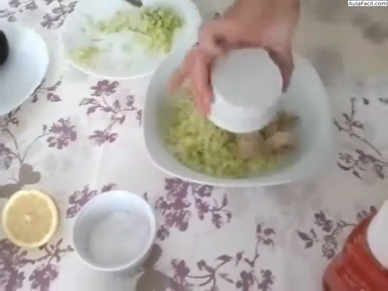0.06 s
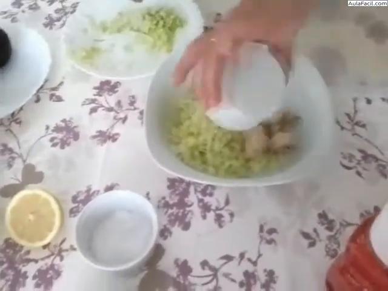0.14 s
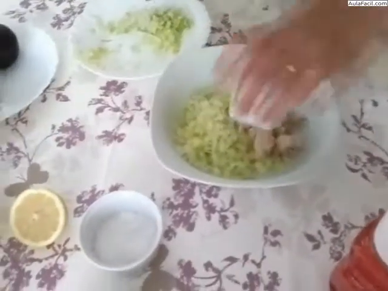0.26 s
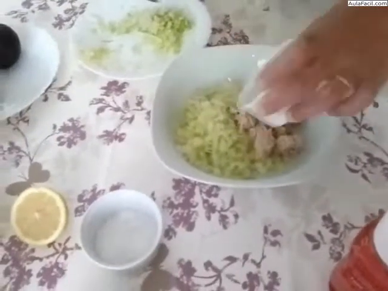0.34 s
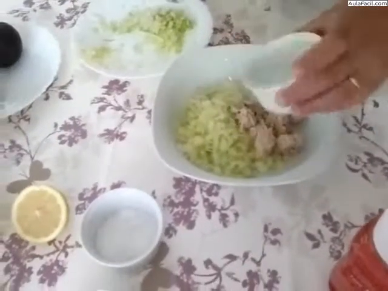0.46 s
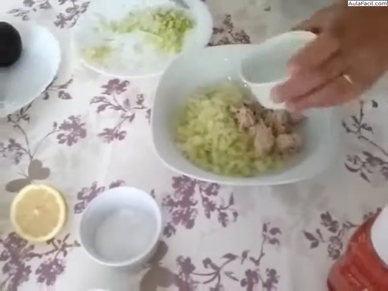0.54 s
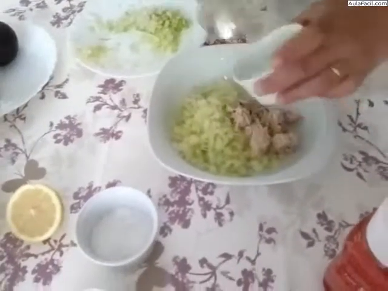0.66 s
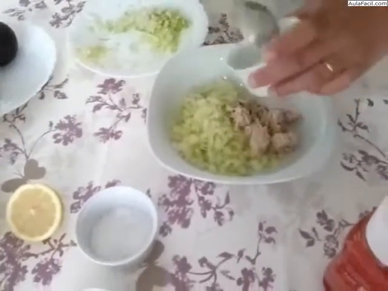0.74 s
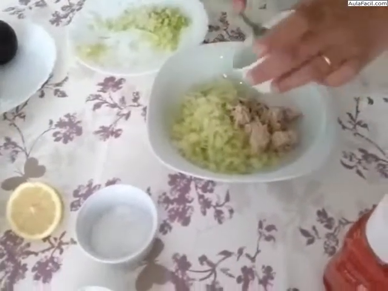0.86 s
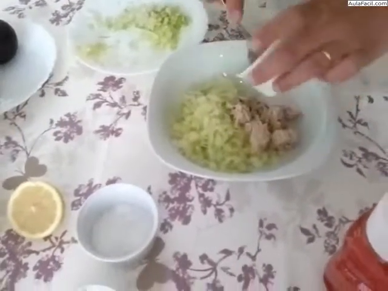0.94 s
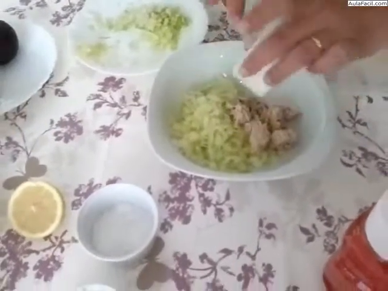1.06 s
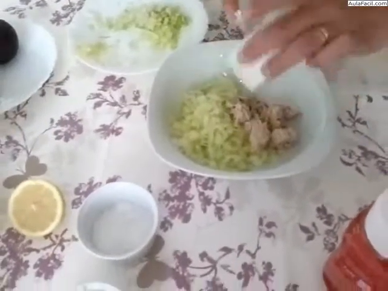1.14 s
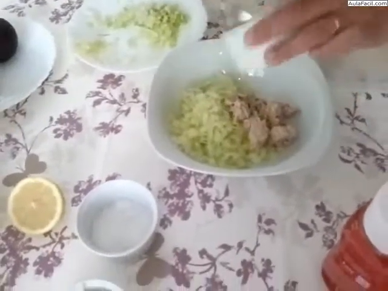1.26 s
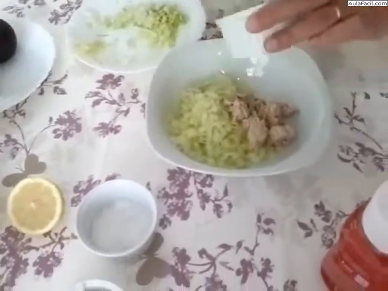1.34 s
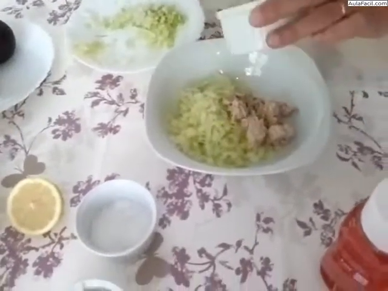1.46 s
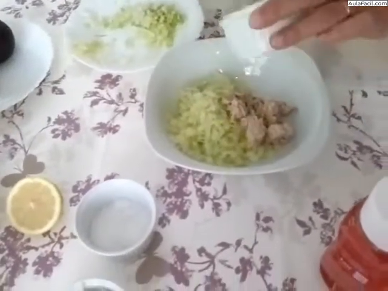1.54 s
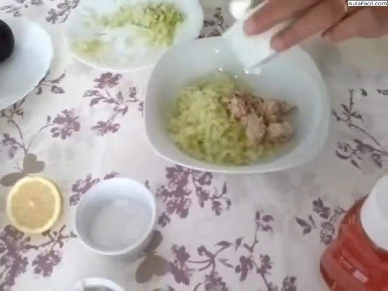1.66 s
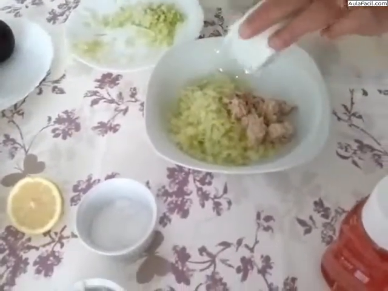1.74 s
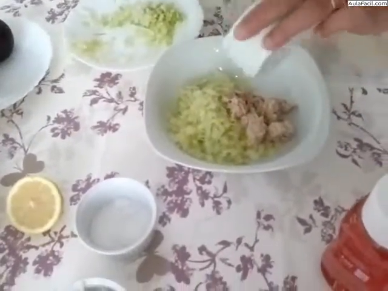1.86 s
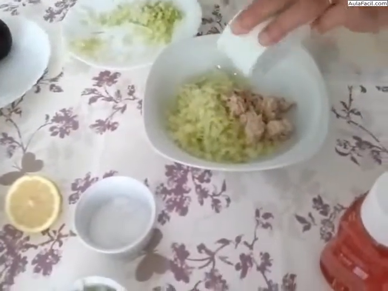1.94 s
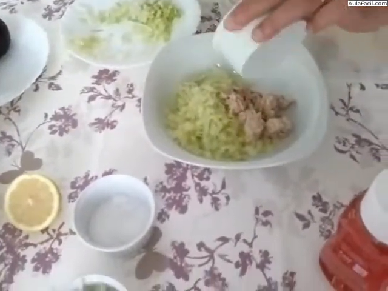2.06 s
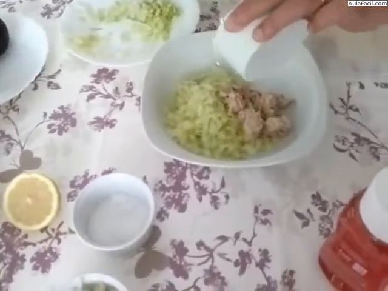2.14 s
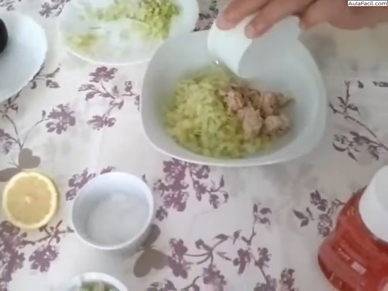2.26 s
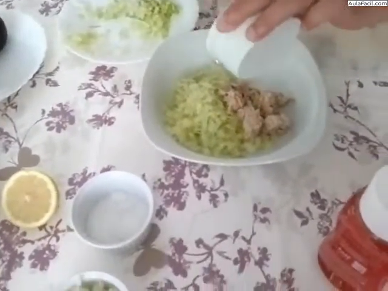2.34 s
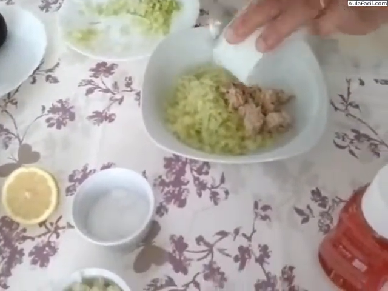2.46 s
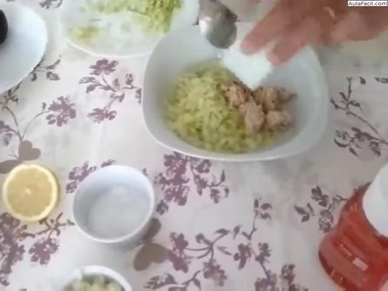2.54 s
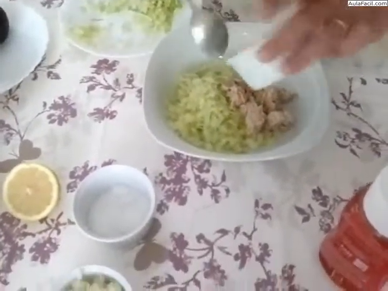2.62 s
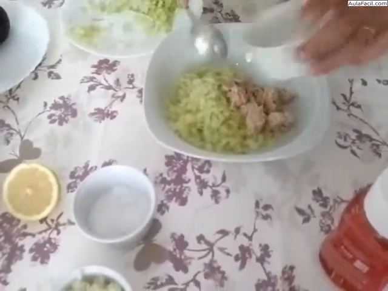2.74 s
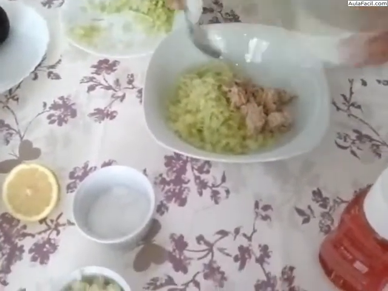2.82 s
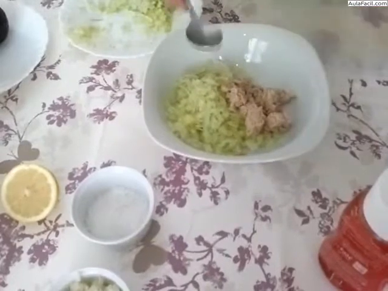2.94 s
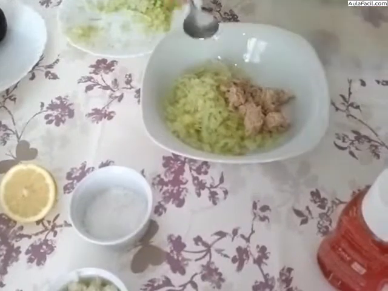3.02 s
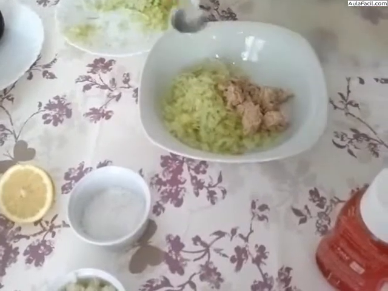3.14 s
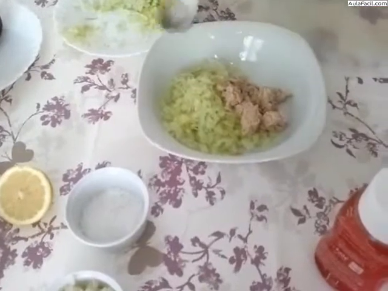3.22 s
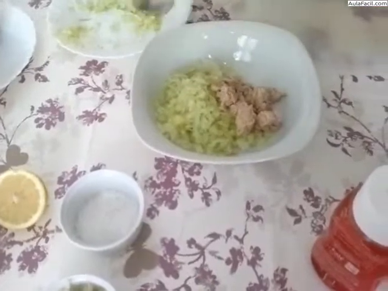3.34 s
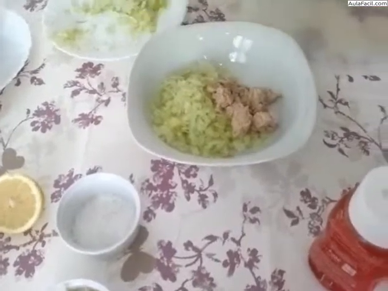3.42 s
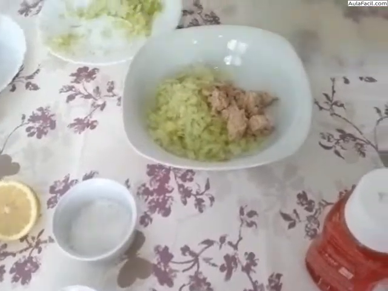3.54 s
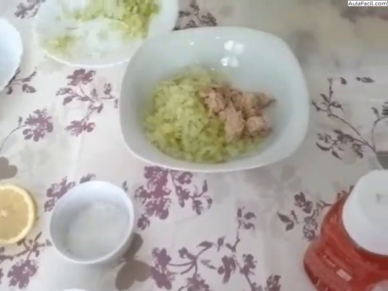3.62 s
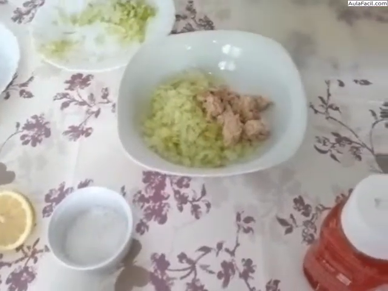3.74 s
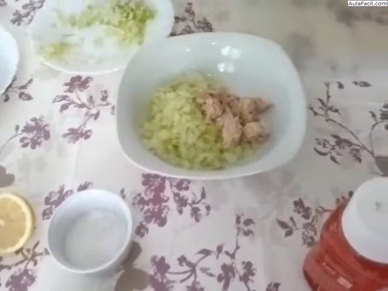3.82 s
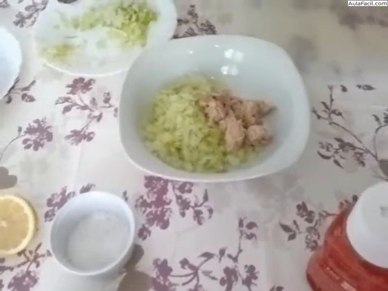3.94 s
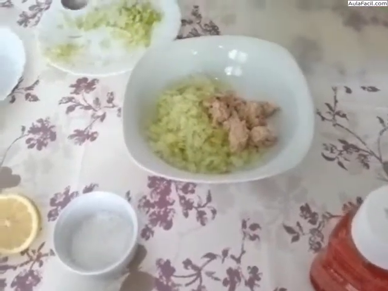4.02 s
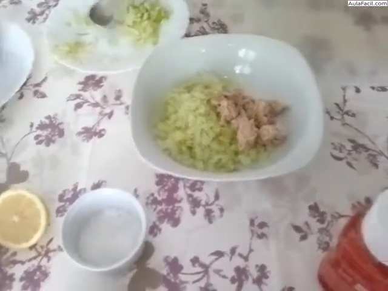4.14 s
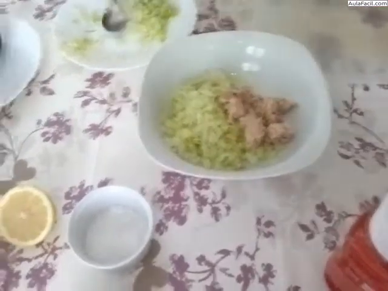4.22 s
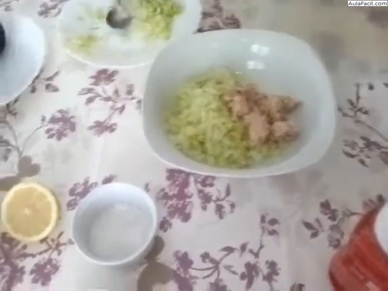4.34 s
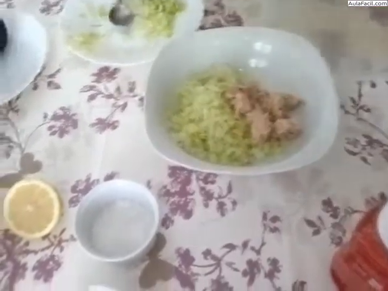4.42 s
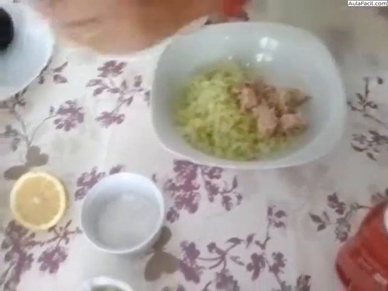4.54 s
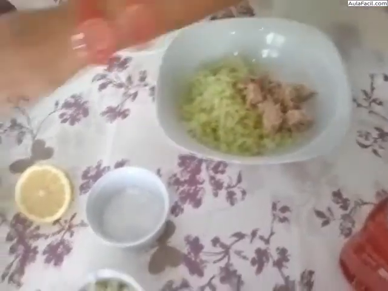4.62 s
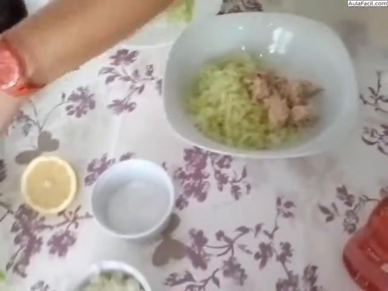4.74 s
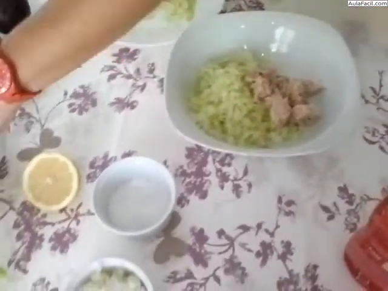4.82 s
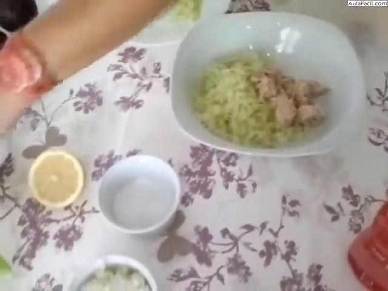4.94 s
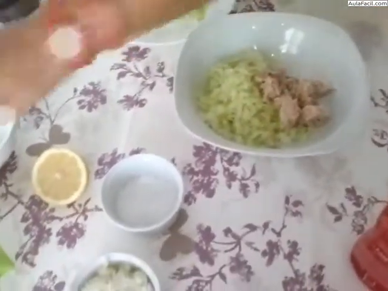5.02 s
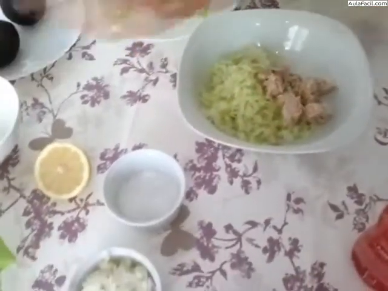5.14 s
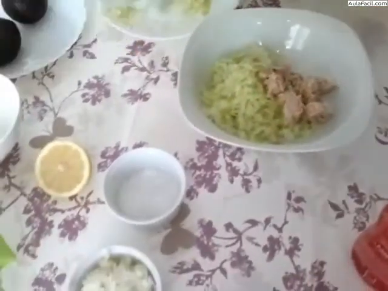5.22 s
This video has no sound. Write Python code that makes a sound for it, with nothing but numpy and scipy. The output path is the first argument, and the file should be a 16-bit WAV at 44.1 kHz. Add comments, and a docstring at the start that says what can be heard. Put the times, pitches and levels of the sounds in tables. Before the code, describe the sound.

Bright spoon-on-cup clinks, small scrapes and soft table bumps in a small hard kitchen, ending with a spoon set down on a plate.

```python
"""A low throbbing drone and an appliance hum run throughout, with soft bumps on a cloth-covered table and food dropping;
a steel spoon clinks and scrapes in a small ceramic cup as tuna is emptied into a bowl, and is laid on a plate.
Hard contacts sum decaying modes and filtered noise bursts; scrapes are sprays of slips; thuds are shaped low noise.
Hum and drone are sines, hush and boom filtered noise; a small bright kitchen adds reflections to hard contacts,
scrapes and food drops. All is heard in mono."""
import sys
import numpy as np
from scipy import signal
from scipy.fft import rfft, irfft, next_fast_len
from scipy.io import wavfile
from scipy.ndimage import map_coordinates

SR = 44100
rng = np.random.default_rng(int(sys.argv[2]) if len(sys.argv) > 2 else 0)


def wav_out(sig):
    """Save sig, one row per channel (or a flat mono array), as 16-bit PCM at SR to the path in sys.argv[1]."""
    wavfile.write(sys.argv[1], SR, np.round(np.clip(np.atleast_2d(sig).T, -1, 1) * 32767).astype(np.int16))


N = 232402
T = np.arange(SR // 2) / SR  # time axis of one contact or room response [s]
IMPULSE = 1. * (T == 0)

# Reverberation of the kitchen. Each row: frequency in Hz, t60 in s (before a late fade of the tail).
REVERBERATION = [(150, 0.71), (1000, 0.38), (2500, 0.27), (5000, 0.26), (9000, 0.25), (15000, 0.13)]
# Spectrum of the room's hush. Each row: frequency in Hz, relative level in dB.
HUSH_SPECTRUM = [(12, -39.5), (20, -10), (60, -2.5), (95, -14.5), (112, -7), (135, 0.5), (187, -13),
                 (329, -10), (357, -10), (629, -15), (823, -23), (892, -26.5), (1530, -29), (1950, -30),
                 (12300, -47), (13200, -72), (22000, -120)]
# Lines of the appliance hum. Each row: mean frequency in Hz, mean level in dB.
HUM_LINES = [(132, -68.5), (331, -73), (397, -77.5), (593, -77)]
# Course of the two low sounds. Each row: time in s, throbbing drone level in dB, boom level in dB.
LOW_LEVELS = [(0, -58, -61), (.25, -45, -48), (.43, -82, -79), (0.848, -73, -73.5), (1.1, -63.5, -58),
              (1.5, -77, -55.5), (1.631, -89, -69), (1.92, -76, -74.5), (2.002, -61, -52.5),
              (2.45, -52, -54), (2.85, -65.5, -70.5), (3.2, -62.5, -60), (3.701, -70, -71),
              (3.999, -63, -57.5), (4.8, -59, -57), (5.27, -62.5, -62)]
# Dull bumps of hands, tin and dishes on the table. Each row: peak in s, level in dB, hill centre in Hz.
TABLE_BUMPS = [(0.158, -54.5, 94), (0.233, -47.5, 71.5), (1.149, -59, 129), (1.311, -59, 140),
               (1.492, -50.5, 131), (2.738, -54.5, 110), (2.975, -61, 402), (4.192, -48.5, 422),
               (4.354, -42.5, 175), (4.679, -51, 240), (4.921, -41, 84)]
# Things sliding over the tablecloth. Each row: peak in s, swell in s, level in dB, hill centre in Hz.
TABLE_SHUFFLES = [(.1, 0.1, -61.5, 328), (.33, 0.042, -56, 161), (0.851, 0.033, -59.5, 469.5),
                  (1.792, 0.063, -60, 524), (2.35, 0.23, -61.5, 246), (3.15, 0.079, -62.5, 376),
                  (4.96, 0.048, -51.5, 215), (5.199, .08, -54.5, 75.7)]
# Wet lumps smacking down. Each row: start in s, level in dB, low-pass cutoff in Hz.
FOOD_SMACKS = [(0.273, -48.5, 2040), (0.2756, -42.5, 1830), (2.744, -55, 2920), (2.7469, -50.5, 2700)]
# Slow rubs of tin, cup and fingers. Each row: peak in s, swell in s, level in dB, hill centre in Hz.
SLOW_RUBS = [(.085, 0.069, -60, 2060), (.27, 0.026, -61, 1620), (0.891, 0.043, -61, 1900),
             (1.674, 0.027, -50, 2480), (2.12, .06, -71, 2370), (2.251, 0.011, -49, 2006),
             (3.2, 0.036, -71, 2370), (3.942, 0.015, -73.5, 2044), (4.239, .02, -63.5, 2225),
             (4.88, 0.12, -71.5, 2050)]
# Quick scuffs of the spoon. Each row: peak in s, level in dB, hill centre in Hz, hill spread in octaves.
QUICK_SCUFFS = [(2.206, -50, 2390, 0.58), (3.641, -60.5, 2550, 0.7), (3.749, -64.5, 1170, 0.62),
                (3.832, -64.5, 1860, 0.6), (4.202, -51.5, 1850, 0.68), (4.203, -59, 7300, 0.48),
                (4.362, -71.5, 1830, 0.33)]
# Light, damped touches of the crockery. Each row: start in s, level in dB, mode in Hz before a pitch factor.
LIGHT_TOUCHES = [(1.668, -47, 3000), (2.196, -41.5, 2740), (2.613, -34.5, 2300), (3.405, -67, 1570)]
# Spoon laid on the plate. Each row: start in s, level in dB before the shares of clack and ring.
PLATE_CONTACTS = [(4.65, -37), (4.663, -23), (4.671, -47)]
# Ringing modes of spoon, cup and plate. Each row: frequency in Hz before a pitch factor and a small
# random shift, mean relative level in dB, t60 in s.
SPOON_MODES = [(2270, -9.5, .1), (2390, 6.5, 0.095), (2460, -11.5, .08), (5445, -2, 0.017),
               (5530, -1, 0.051), (9300, -3, 0.05), (10100, -9, 0.032)]
CUP_MODES = [(1450, -8, .06), (2110, -15.5, 0.14), (3384, -9.5, .06), (6760, -9.5, 0.23), (6930, 5, 0.1),
             (8370, -22, 0.075), (11400, -12, 0.032), (11960, -10, 0.037), (13950, -24, .05)]
PLATE_MODES = [(1522, -22.5, 0.072), (2040, -9, 0.089), (2544, 2, 0.042), (3140, -12, 0.12),
               (4230, -5.5, 0.13), (4717, 4, 0.039), (5670, -3, 0.048), (6830, -5.5, 0.13),
               (8220, -9, 0.051), (9400, -9.5, 0.087), (9720, -8, .07), (10770, -7, 0.056)]
# Crowded modes of the plate. Each row: frequency in Hz, relative gain in dB.
PLATE_CROWD = [(120, -62), (200, -36), (393, -6), (744, -20.5), (943, -15), (1150, -22.5), (1460, -6),
               (3500, -1.5), (4210, 3.5), (5330, -15), (6880, -14), (10700, -19), (15600, -14.5)]
# Broad, heavily damped resonances of the hand-held cup and spoon. Each row: centre in Hz,
# width in Hz, relative gain in dB.
CUP_CROWD = [(680, 1300, -10.5), (1450, 520, 0), (2600, 820, 0.5), (3260, 130, 8.5), (4400, 2600, -7),
             (5700, 330, -6.5), (6160, 430, -8), (6900, 920, -3.5), (8340, 380, -5.5), (9813, 650, -5),
             (10630, 350, -11.5), (11920, 1200, -5), (12900, 500, -16), (13950, 560, -8.5)]
# The spoon grazes the rim and chatters once. Each row: first touch in s, rebound in s after it, then for
# the rebound: spoon ring in dB, clack in dB, cup ring in dB.
RIM_GRAZES = [(0.988, 0.0091, -32.5, -40.5, -52.5), (1.451, 0.009, -36.5, -41.5, -56.5),
              (1.815, 0.0092, -26.5, -36, -48.5), (2.422, 0.0097, -58, -36, -32.5)]
# The spoon hits the cup squarely. Each row: start in s, clack in dB, spoon ring in dB, cup ring in dB,
# main cup partial in Hz, knock in dB, knock centre in Hz.
CUP_STRIKES = [(1.0174, -24, -36.5, -32.5, 6930, -26.5, 1981), (1.022, -27, -43.5, -21, 6937, -32, 4574),
               (1.482, -28.5, -35, -35, 6970, -30, 3530), (1.498, -31, -54, -37.5, 6970, -29.5, 2144),
               (1.907, -23.5, -31.5, -26.5, 7088, -46.5, 1450), (2.465, -29.5, -31, -31, 6863, -25.5, 3310),
               (2.609, -36.5, -38, -40, 6830, -34, 3560)]

TOP_HZ = 15750  # upper band limit
DRONE_HZ, THROB_HZ, THROB_DB = 56.6, 6.7, -3.5  # a second tone this much lower beats with the first
BOOM_HZ, BOOM_OCTAVES = 136.4, 0.15
MOVE_S = 1.2  # length of the window that holds one movement
BUMP_RISE_S, BUMP_FALL_S, BUMP_OCTAVES = 0.0066, 0.034, 1.0
SHUFFLE_OCTAVES = 0.87
SLIPS_PER_S = 1600
RUB_OCTAVES, RUB_TOP = .42, 1.45  # spread of a rub; its treble is cut at this multiple of the centre
SCUFF_RISE_S, SCUFF_FALL_S = 0.012, .016
TOUCH_T60_S = 0.049
CUP_HZ = 6930  # main cup partial at pitch 1
GRAZE_TILT_DB, STRIKE_TILT_DB = 4.5, 1  # clack brightness per octave
# levels of a graze's first touch against its rebound
FIRST_TOUCH_RING_DB, FIRST_TOUCH_CLACK_DB, FIRST_TOUCH_CUP_DB = -3, -3.5, -15
FIRST_TOUCH_TOP_HZ = 6860  # being light, it is also duller


def amp(db):
    """The decibel law: level to amplitude gain."""
    return 10 ** (np.asarray(db) / 20)


def unit(x):
    """Normalisation of power: scaled to rms 1."""
    return x / np.sqrt(np.mean(x ** 2) + 1e-20)


def blow(x):
    """Normalisation of energy: scaled to that of 30 ms at rms 1."""
    return x / np.sqrt(np.sum(x ** 2) / (.03 * SR) + 1e-20)


def along(points, hz):
    """Interpolation of (Hz, value) points on a logarithmic frequency axis."""
    f, v = np.transpose(points)
    return np.interp(np.log(hz + 1), np.log(f + 1), v)


def wobble(rate):
    """Slow random fluctuation: a smooth curve through rate random knots a second."""
    knots = rng.standard_normal(int(N * rate / SR) + 4)
    return map_coordinates(knots, [np.arange(N) * rate / SR])


def filtered(x, response):
    """Linear filtering: the spectrum of x times a response of frequency."""
    m = next_fast_len(len(x) + 4096)
    return irfft(rfft(x, m) * response(np.fft.rfftfreq(m, 1 / SR)), m)[:len(x)]


def hill(hz, centre_hz, octaves):
    """A broad resonance: a Gaussian on a log axis, octaves its standard deviation."""
    return np.exp(-.5 * (np.log2((hz + 1) / centre_hz) / octaves) ** 2)


def shaped(grain, envelope, response):
    """Modulated noise: grain under an envelope, coloured, with the envelope's own energy."""
    return unit(filtered(grain * envelope, response)) * np.sqrt(np.mean(envelope ** 2))


def stroke(rise, fall):
    """Envelope of a movement: a swell that peaks in the middle of its window."""
    t = np.arange(int(MOVE_S * SR)) / SR - MOVE_S / 2
    scale = np.where(t < 0, rise, fall)
    return np.exp(1 - np.sqrt(1 + 2 * (t / scale) ** 2))


def add(track, s, x):
    """Superposition: mix x into the track from time s."""
    start = round(s * SR)
    part = x[max(-start, 0):N - start]
    track[max(start, 0):][:len(part)] += part


def through(x, path):
    """Convolution: x as it arrives along a path."""
    return signal.fftconvolve(x, path)[:len(x)]


def kitchen(direct_db):
    """Room impulse response: direct sound, a few bounces off table and bowl, a dense tail from hard walls."""
    hz, t, noise = signal.stft(rng.standard_normal(len(T)), SR, nperseg=256)
    decay = amp(-60 * t / along(REVERBERATION, hz)[:, None])
    tail = signal.istft(noise * decay, SR, nperseg=256)[1][:len(T)]
    # the tail builds up gradually and fades faster late on
    tail = tail * (1 - np.exp(-T / 0.0043)) * np.exp(-(T / .17) ** 4)
    # the hand shades the treble of the direct sound
    direct = signal.lfilter(*signal.butter(1, 5000, fs=SR), IMPULSE)
    path = tail / np.linalg.norm(tail) + amp(direct_db) * direct
    # close surfaces repeat it all within a few milliseconds and comb its spectrum
    near = IMPULSE.copy()
    near[rng.integers(SR // 2000, SR // 160, size=4)] += .3 * rng.choice([-1, 1], size=4)
    return through(path, near / np.linalg.norm(near))


def hum():
    """Frequency modulation: the appliance's lines waver together in pitch, each also in level."""
    turns = np.cumsum(1 + .006 * wobble(19)) / SR
    return sum(amp(db + 5.6 * wobble(25)) * np.sin(2 * np.pi * hz * turns) for hz, db in HUM_LINES)


def hush():
    """Coloured noise of the room: its low part comes in lumps, the hiss stays smooth."""
    noise = unit(filtered(rng.standard_normal(N), lambda f: amp(along(HUSH_SPECTRUM, f))))
    rumble = filtered(noise, lambda f: 1 / (1 + (f / 900) ** 4))
    lumpy = rumble * amp(2.8 * wobble(30) - 3.5)
    return amp(-62.0) * (noise - rumble + lumpy)


def drone():
    """Beating: two close low tones throb under a narrow noise-band boom that comes and goes."""
    t = np.arange(N) / SR
    s, *levels = np.transpose(LOW_LEVELS)
    drone_db, boom_db = [np.interp(t, s, level) for level in levels]
    # the phase of each tone wanders
    upper, lower = [np.sin(2 * np.pi * hz * t + 1.3 * wobble(5)) for hz in (DRONE_HZ, DRONE_HZ - THROB_HZ)]
    tones = unit(upper + amp(THROB_DB) * lower)
    boom = unit(filtered(rng.standard_normal(N), lambda f: hill(f, BOOM_HZ, BOOM_OCTAVES)))
    return amp(drone_db) * tones + amp(boom_db) * boom


def thud(envelope, hz, octaves):
    """Absorption: the tablecloth leaves only the low part of a movement."""
    noise = rng.standard_normal(len(envelope))
    return shaped(noise, envelope, lambda f: hill(f, hz, octaves) / np.sqrt(f + 30))


def table():
    """Impact and sliding: bumps start abruptly and die away; shuffles swell and fade evenly."""
    out = np.zeros(N)
    for s, db, hz in TABLE_BUMPS:
        add(out, s - MOVE_S / 2, amp(db) * thud(stroke(BUMP_RISE_S, BUMP_FALL_S), hz, BUMP_OCTAVES))
    for s, swell, db, hz in TABLE_SHUFFLES:
        add(out, s - MOVE_S / 2, amp(db) * thud(stroke(swell, swell), hz, SHUFFLE_OCTAVES))
    return out


def smacks():
    """Soft impact: a wet lump lands with one short dull snap, a band-limited impulse with no ring."""
    out = np.zeros(N)
    for s, db, top_hz in FOOD_SMACKS:
        snap = signal.sosfilt(signal.butter(8, top_hz, fs=SR, output="sos"), IMPULSE)
        snap = signal.sosfilt(signal.butter(1, 220, "high", fs=SR, output="sos"), snap)
        reflected = through(snap, kitchen(direct_db=18))
        add(out, s, amp(db) * blow(snap + amp(-16.0) * reflected))
    return out


def friction(envelope, colour):
    """Stick-slip friction: a spray of tiny slips of uneven size, muffled by the wet food."""
    slipping = rng.random(len(envelope)) < SLIPS_PER_S / SR
    slips = rng.standard_normal(len(envelope)) * slipping
    return shaped(slips, envelope, colour)


def scrapes():
    """Sliding contact: rubs swell and fade evenly, muffled; scuffs are short, each with its own colour."""
    out = np.zeros(N)
    for s, swell, db, hz in SLOW_RUBS:
        colour = lambda f: hill(f, hz, RUB_OCTAVES) / np.sqrt(1 + (f / (RUB_TOP * hz)) ** 20)
        add(out, s - MOVE_S / 2, amp(db) * friction(stroke(swell, swell), colour))
    for s, db, hz, octaves in QUICK_SCUFFS:
        colour = lambda f: hill(f, hz, octaves)
        add(out, s - MOVE_S / 2, amp(db) * friction(stroke(SCUFF_RISE_S, SCUFF_FALL_S), colour))
    path = kitchen(direct_db=10.5)
    return through(out, path / np.linalg.norm(path))


def ring(modes, path, pitch, attack):
    """Modal synthesis: decaying modes, at slightly new strengths for every point of contact."""
    out = np.zeros(len(T))
    for (hz, db, t60), chance in zip(modes, rng.standard_normal((len(modes), 2))):
        tone = np.sin(2 * np.pi * hz * pitch * (1 + 0.0011 * chance[0]) * T)
        mode = tone * amp(-60 * T / t60) * (1 - np.exp(-T / attack))
        out += amp(db + chance[1]) * blow(through(mode, path))
    return blow(out)


def clack(colour, path, tilt_db, t60):
    """Modal density: a hard contact sets off a crowd of quickly damped modes, tilted in brightness."""
    burst = rng.standard_normal(len(T)) * amp(-60 * T / t60) * (1 - np.exp(-T / 0.0023))
    response = lambda hz: colour(hz) * amp(tilt_db * np.log2((hz + 500) / 3000))
    return blow(filtered(through(burst, path), response))


def touches():
    """Selective excitation: a light touch wakes a single mode."""
    out = np.zeros(N)
    for s, db, hz in LIGHT_TOUCHES:
        mode = [(hz, 0, TOUCH_T60_S)]
        add(out, s, amp(db) * ring(mode, kitchen(direct_db=1.5), pitch=0.97, attack=0.0012))
    return out


def plate_colour(hz):
    """Spectral envelope: gain of the plate's crowded modes."""
    return amp(along(PLATE_CROWD, hz))


def spoon_laid():
    """Repeated impact: the spoon touches the plate, drops and bounces once."""
    out = np.zeros(N)
    for s, db in PLATE_CONTACTS:
        path = kitchen(direct_db=0.5)
        add(out, s, amp(db - 3) * clack(plate_colour, path, tilt_db=0.76, t60=0.094))
        add(out, s, amp(db - 5) * ring(PLATE_MODES, path, pitch=1, attack=.0005))
    return out


def cup_colour(hz):
    """Radiation: gain of the cup's broad resonances; so small a body radiates little bass."""
    power = sum(amp(db) ** 2 / (1 + ((hz - centre) / (0.5 * width)) ** 2) ** 2
                for centre, width, db in CUP_CROWD)
    return np.sqrt(power) * hz ** 2 / (hz ** 2 + 330 ** 2)


def contact(clack_db, tilt_db, spoon_db, cup_db, cup_hz):
    """Impact of two bodies: spoon meets cup with a clack, and both ring; the grip shifts the cup's pitch."""
    path = kitchen(direct_db=2)
    # the open cup beams its ring upwards, so more of it arrives directly
    cup = ring(CUP_MODES, kitchen(direct_db=2.5), pitch=cup_hz / CUP_HZ, attack=0.0012)
    crowd = clack(cup_colour, path, tilt_db, t60=0.083)
    spoon = ring(SPOON_MODES, path, pitch=0.98, attack=.001)
    return amp(clack_db) * crowd + amp(spoon_db) * spoon + amp(cup_db) * cup


def grazes():
    """Glancing impact, tilted brighter than a square hit: a light, duller touch, then a firmer rebound."""
    out = np.zeros(N)
    for s, rebound_s, spoon_db, clack_db, cup_db in RIM_GRAZES:
        touch = contact(clack_db + FIRST_TOUCH_CLACK_DB, GRAZE_TILT_DB, spoon_db + FIRST_TOUCH_RING_DB,
                        cup_db + FIRST_TOUCH_CUP_DB, CUP_HZ)
        add(out, s, signal.lfilter(*signal.butter(1, FIRST_TOUCH_TOP_HZ, fs=SR), touch))
        add(out, s + rebound_s, contact(clack_db, GRAZE_TILT_DB, spoon_db, cup_db, CUP_HZ))
    return out


def strikes():
    """Direct impact: a square hit is fuller, and the struck spot gives a short knock of its own pitch."""
    out = np.zeros(N)
    for s, clack_db, spoon_db, cup_db, cup_hz, knock_db, knock_hz in CUP_STRIKES:
        add(out, s, contact(clack_db, STRIKE_TILT_DB, spoon_db, cup_db, cup_hz))
        colour = lambda hz: hill(hz, knock_hz, octaves=.3)
        add(out, s, amp(knock_db) * clack(colour, kitchen(direct_db=5), tilt_db=-4, t60=0.034))
    return out


def scene():
    """Superposition at one microphone, the same in both channels."""
    background = hum() + hush() + drone()
    soft = table() + smacks() + scrapes()
    crockery = touches() + spoon_laid() + grazes() + strikes()
    mono = background + soft + crockery
    return np.array([mono, mono])


def record(dry):
    """Band limitation: the response falls to nothing over the 500 Hz below the upper limit."""
    return np.array([filtered(channel, lambda hz: np.clip((TOP_HZ - hz) / 500, 0, 1)) for channel in dry])


dry = scene()
out = record(dry)
wav_out(out)
```